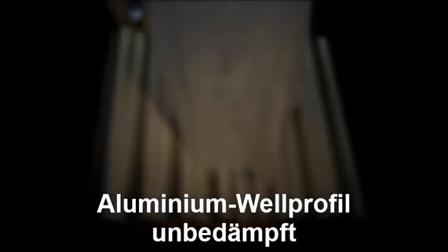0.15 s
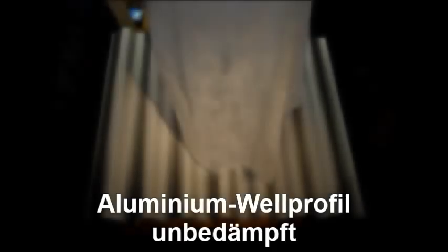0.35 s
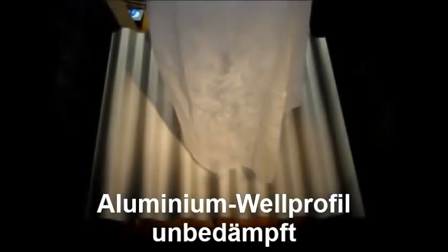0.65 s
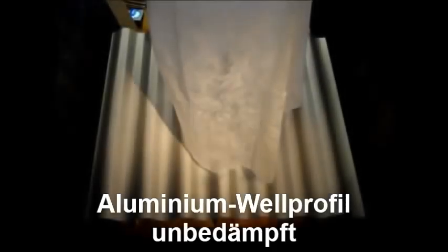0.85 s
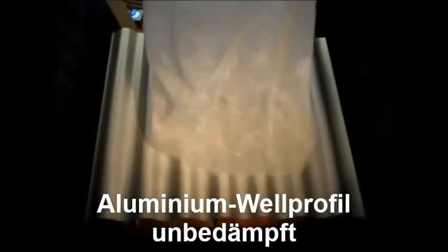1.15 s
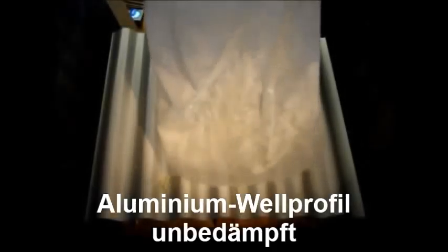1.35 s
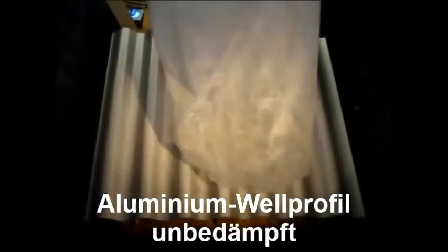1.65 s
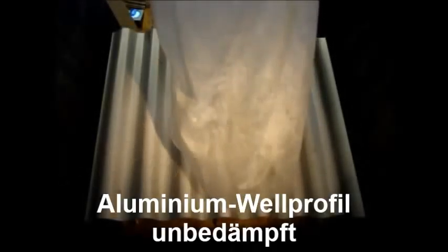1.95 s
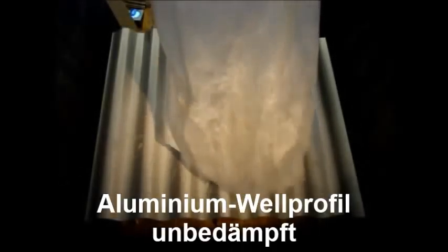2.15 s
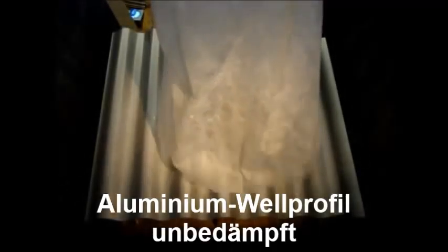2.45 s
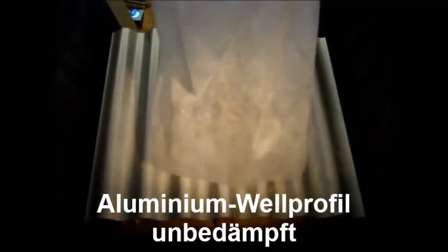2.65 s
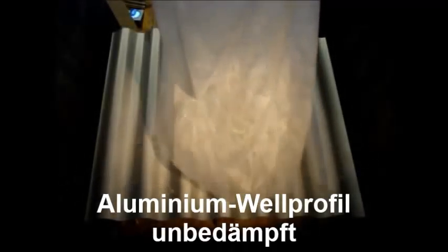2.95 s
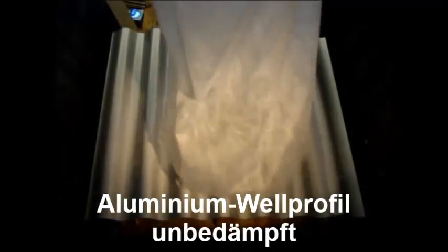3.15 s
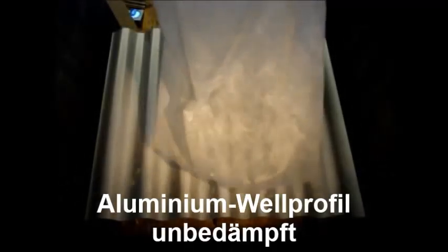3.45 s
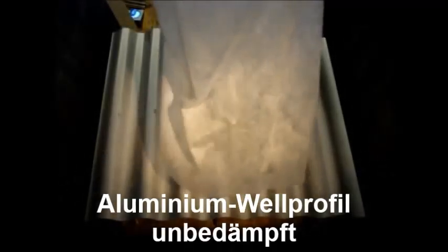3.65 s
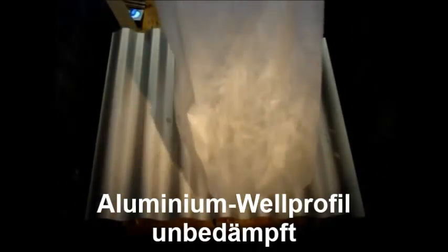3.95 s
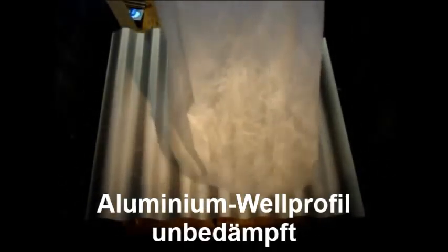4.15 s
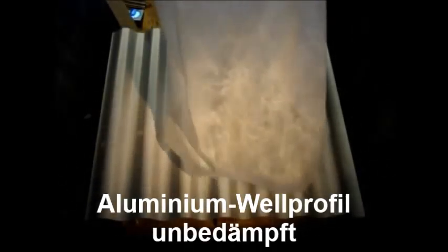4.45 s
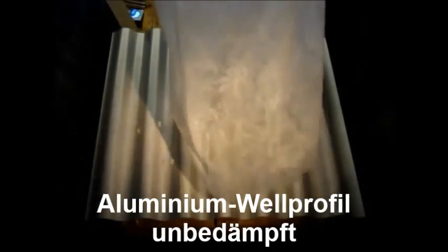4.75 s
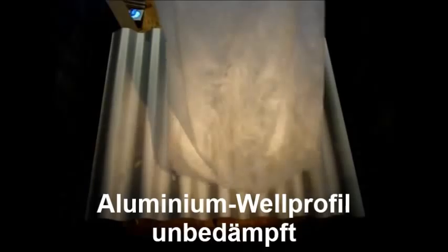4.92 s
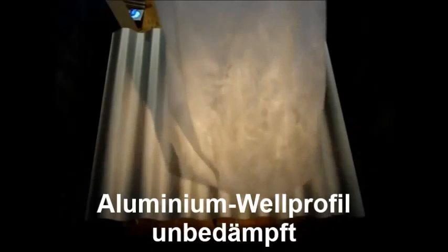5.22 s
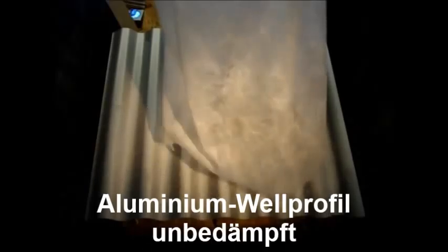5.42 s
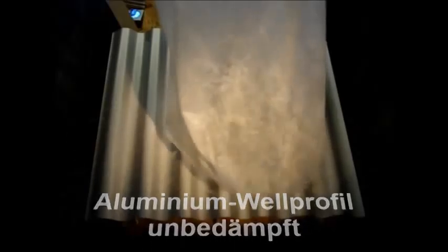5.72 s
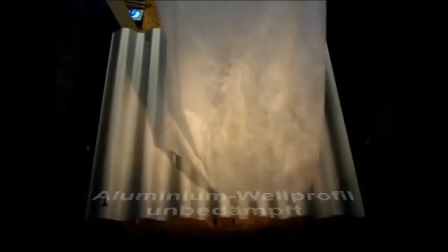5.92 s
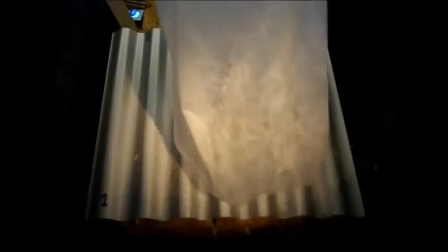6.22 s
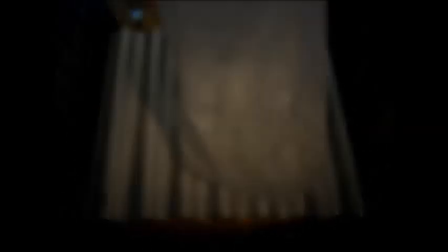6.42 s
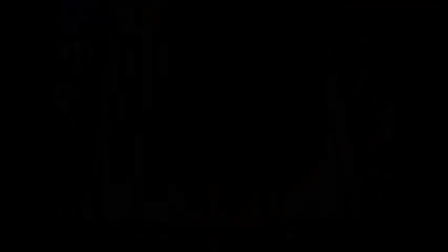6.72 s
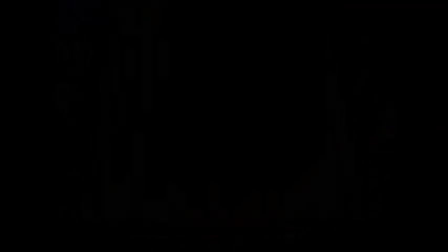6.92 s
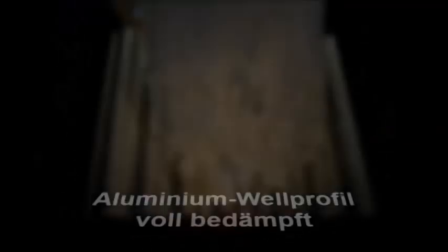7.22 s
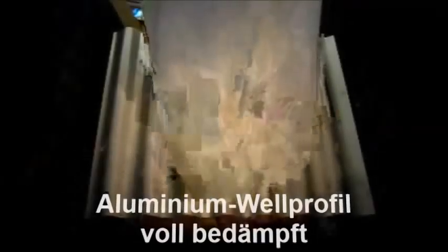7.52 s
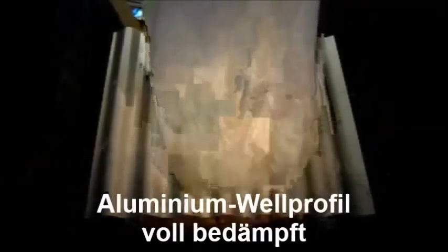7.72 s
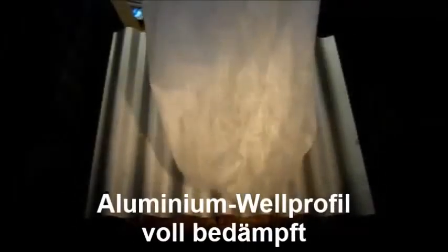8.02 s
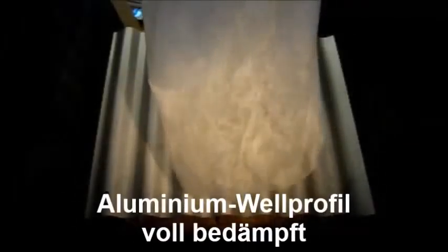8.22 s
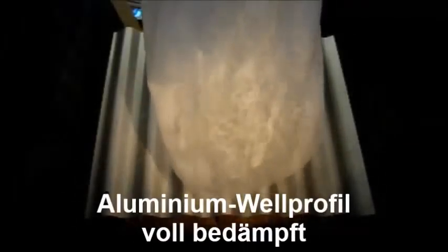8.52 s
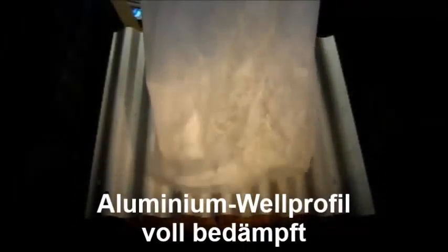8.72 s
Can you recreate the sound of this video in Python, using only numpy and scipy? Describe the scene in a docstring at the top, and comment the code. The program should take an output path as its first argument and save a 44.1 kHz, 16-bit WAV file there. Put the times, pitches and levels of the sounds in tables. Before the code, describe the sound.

Quiet electrical hum and hiss, then a tiny metallic valve clack. A loud, bright shower bursts onto bare corrugated aluminium, a dense tinny roar of countless ringing drops, steady for nearly six seconds. It cuts off to complete silence briefly, then the same shower resumes on a damped sheet, much quieter, duller and drier. Close single microphone, mono, slightly overloaded on the loud part, indoor test room.

```python
"""A shower falls on bare corrugated aluminium in a rain test: thousands of drops a second ring its modes.
Each drop is a short burst of noise plus decaying tones, landing at a random moment on a random spot.
A valve clacks first, made of noise cracks and metallic tones; a faint whistle stops before it.
After a silence the same shower patters on a damped sheet, quieter and duller.
Both runs come through one microphone channel with mains hum, buzz and hiss."""
import sys
import numpy as np
from scipy import signal
from scipy.fft import rfft, irfft, next_fast_len
from scipy.io import wavfile
from scipy.ndimage import uniform_filter1d, map_coordinates

SR = 44100
rng = np.random.default_rng(int(sys.argv[2]) if len(sys.argv) > 2 else 0)


def store_wav(level_fs):
    """Save 16-bit WAV to argv[1]."""
    pcm = np.round(np.clip(np.atleast_2d(level_fs), -1, 1) * 32767)
    wavfile.write(sys.argv[1], SR, pcm.T.astype(np.int16))


N = 391166

# bending modes of each sheet, the notes it rings at: (frequency [Hz], width [Hz], relative level [dB])
BARE_SHEET_MODES = [(263.2, 20, -9), (379, 15.5, -13.5), (425, 16, -14), (696, 73, -21.5), (942, 25.4, -10),
                    (981, 20, -7.5), (1124, 29, -12.5), (1214, 18, -7), (1347, 16, -7), (1545, 39, -9.5),
                    (1910, 34, -5), (2040, 41, -10.5), (2226, 10.6, -6), (2322, 67, -12.5), (2620, 17, -6),
                    (3073, 26, -6.5), (3602, 18, -3), (3900, 13, -3.5), (4207, 30, -0.5), (4510, 22, -1),
                    (4872, 53, -3), (5247, 38, -2.5), (6030, 37, -2.5), (6350, 16, 0.5), (6750, 13, -1.5),
                    (7820, 21, -3.5), (8200, 20, -4), (8970, 57, -13.6), (11250, 39, -17), (11830, 56, -15)]
DAMPED_SHEET_MODES = [(207, 38, -4.5), (288, 38, -4.3), (470, 25, -9), (1080, 95, 0.5), (1924, 72, -1.5),
                      (2130, 170, -7), (2370, 34, -1), (2645, 98, -3), (3090, 64, -1.5), (3360, 50, -1.5),
                      (3770, 120, -2.5), (4440, 252, -4.5), (4955, 100, -4), (5160, 180, -1),
                      (6450, 67, -6)]
# wash of splashes and crowded weak modes between those notes: (frequency [Hz], relative level [dB])
BARE_SHEET_WASH = [(25, -39.5), (80, -30), (200, -25.5), (560, -29), (850, -19.5), (2400, -15),
                   (2830, -16.5), (3200, -9), (5100, -11), (5650, -12), (7650, -10), (8700, -17),
                   (12800, -20.5), (14400, -17), (15800, -18)]
DAMPED_SHEET_WASH = [(25, -27), (80, -18.5), (350, -13), (600, -20), (830, -7.5), (1300, -7.5),
                     (1650, -7.5), (4000, -8), (5600, -8.5), (7600, -7.5), (9500, -13.5), (12700, -15),
                     (15600, -10.5)]
# how long the wash of one drop takes to fade by 60 dB: (frequency [Hz], fade time [s])
BARE_WASH_FADE = [(200, 0.13), (4000, 0.12), (8000, 0.055), (14000, 0.02)]
DAMPED_WASH_FADE = [(200, 0.078), (4000, 0.024), (8000, 0.014), (14000, 0.013)]
# strikes and rattles of the valve's plunger: (time [s], level [dB])
VALVE_STRIKES = [(.812, -42), (.817, -46), (.829, -41)]
# notes of the valve's metal body: (frequency [Hz], relative level [dB], time to fade by 60 dB [s])
VALVE_BODY_MODES = [(344, 4, 0.074), (970, -3, .06), (1224, -5, 0.18), (1980, -11, 0.091), (2950, -1, 0.11),
                    (3010, -15.5, 0.68), (3450, -2, .07), (4177, -6, 0.2), (5400, -2, .09),
                    (6880, -13, .05), (7300, -4, .05), (9380, -16, .06)]
# tone colour of the valve's crack and of the channel noises: (frequency [Hz], relative level [dB])
CRACK_COLOUR = [(100, -18.5), (330, 4), (1200, 1.5), (2200, -12.5), (3200, -3), (7500, -8.5), (10000, -20),
                (15000, -29.5)]
HUM_COLOUR = [(20, -8.5), (50, 2), (150, -6.5), (250, -13), (350, -23.5), (450, -17.5), (800, -28.5),
              (2000, -34.5), (15000, -54)]
BUZZ_COLOUR = [(50, -9.5), (1000, -3.5), (4500, 3), (8000, -5), (11000, -5), (14500, -1.5)]
HISS_COLOUR = [(25, 3.5), (100, -6.5), (350, -11), (900, -23), (10000, -26.5), (14500, -21.5)]
# brief lulls where the stream thins out: (time [s], depth [dB])
STREAM_LULLS = [(1.09, 6.5), (1.172, 8), (1.262, 3.5), (1.307, 3), (3.606, 2), (4.739, 5.5), (5.026, 2),
                (5.538, 2), (7.348, 3.5), (7.646, 2.5), (8.696, 6.5)]

SPRAY_START, CUT_START, CUT_END = 1.077, 6.76, 7.092  # s
MAINS_HZ, WHINE_HZ = 50, 14035
TOP_HZ = 15830  # band limit of the channel
BARE_DB, DAMPED_DB = -16.35, -25.5  # level on each sheet once the pressure is up, before any thinning
START_WEAK_DB, BUILD_UP_S = 2.5, 0.1  # shortfall at the start, and the time constant of its fading
LULL_S = 0.012  # each lull fades in and out over about this time
SLAP_DB, SLAP_S = 2, 0.004  # extra strength as the stream's front lands, and its time constant


def amp(db):
    """Turn decibels into a plain multiplier."""
    return 10 ** (np.asarray(db) / 20)


def unit(x):
    """Scale a sound to an average (rms) strength of one."""
    return x / np.sqrt(np.mean(x ** 2) + 1e-20)


def clock():
    """The time of every sample, in seconds."""
    return np.arange(N) / SR


def along(points, hz):
    """Read a curve of (Hz, value) points, joined by lines on a log frequency axis."""
    f, v = np.transpose(points)
    return np.interp(np.log(hz + 1), np.log(f + 1), v)


def wobble(rate, steady_s=0.14):
    """Quick random swings, rate knots a second, that even out over steady_s."""
    knots = rng.standard_normal(int(N * rate / SR) + 4)
    swings = map_coordinates(knots, [clock() * rate])
    return swings - uniform_filter1d(swings, int(steady_s * SR))


def coloured(x, spectrum, size=8192):
    """Filter x to the given (Hz, dB) curve, with no sound ahead of its cause."""
    log_gain = np.log(amp(along(spectrum, np.fft.rfftfreq(size, 1 / SR))))
    # folding the cepstrum puts the whole response after time zero
    cepstrum = irfft(log_gain)
    cepstrum[1:size // 2] *= 2
    cepstrum[size // 2 + 1:] = 0
    response = irfft(np.exp(rfft(cepstrum)))
    filtered = signal.fftconvolve(np.atleast_2d(x), response[None], axes=1)
    return filtered[:, :x.shape[-1]].reshape(x.shape)


def whine(hz, db, end):
    """A thin, faint whistle: one pure tone that fades out in the last 0.05 s before end."""
    t = clock()
    fade = np.clip((end - t) * 20, 0, 1)
    return amp(db) * np.sin(2 * np.pi * hz * t) * fade


def mains(hum_db, buzz_db, hiss_db):
    """Pick-up in the cable: every half cycle a sharp spike, then a surge of the same sign, over hiss."""
    half_cycle, lag = round(SR / MAINS_HZ / 2), round(.0017 * SR)  # samples
    kicks = np.zeros(N)
    moments = np.arange(half_cycle // 2, N, half_cycle)
    kicks[moments] = (-1) ** np.arange(len(moments))
    buzz = amp(buzz_db) * unit(coloured(kicks, BUZZ_COLOUR))
    hum = amp(hum_db) * unit(coloured(np.roll(kicks, lag), HUM_COLOUR))
    hiss = amp(hiss_db) * unit(coloured(rng.standard_normal(N), HISS_COLOUR))
    return hum + buzz + hiss


def valve(crack_db, crack_t60, room_db, room_t60, blur_hz):
    """Each contact is a short crack and a rough metallic ring, with a faint room tail."""
    out, t = np.zeros(N), np.arange(SR // 2) / SR
    for s, db in VALVE_STRIKES:
        # loose parts jostle, so the phase of each mode wanders
        steps = rng.standard_normal((len(VALVE_BODY_MODES), len(t)))
        wander = np.cumsum(steps, axis=1) * np.sqrt(2 * np.pi * blur_hz / SR)
        ring = np.zeros(len(t))
        for (hz, level, t60), phase in zip(VALVE_BODY_MODES, wander):
            ring += amp(level - 60 * t / t60) * np.sin(2 * np.pi * hz * t + phase)
        fading = amp(crack_db - 60 * t / crack_t60) + amp(room_db - 60 * t / room_t60)
        crack = fading * unit(coloured(rng.standard_normal(len(t)), CRACK_COLOUR))
        out[round(s * SR):][:len(t)] += amp(db) * (.5 * ring + crack)
    return out


def flow():
    """Strength of the stream in dB: a slap, a build-up, then it holds, apart from brief lulls."""
    t = clock()
    age = np.maximum(t - SPRAY_START, 0)
    slap = SLAP_DB * np.exp(-age / SLAP_S)
    shortfall = START_WEAK_DB * np.exp(-age / BUILD_UP_S)
    lulls = sum(depth_db * np.exp(-((t - s) / LULL_S) ** 2) for s, depth_db in STREAM_LULLS)
    return slap - shortfall - lulls


def spray(level_db, slosh_db, flutter_db):
    """Force of the stream: it flutters, and sloshing thins it out for moments."""
    flutter = flutter_db * wobble(110)
    slosh = slosh_db * np.abs(wobble(20))
    return amp(level_db + flow() + flutter - slosh)


def sheet(modes, wash, decay, count=24, size=8192):
    """The sound of one drop at each of count spots: fading noise plus the ringing modes."""
    # treble and bass of the noise fade at their own speeds
    hz, frames, z = signal.stft(rng.standard_normal((count, size)), SR, nperseg=128)
    fading = amp(-60 * frames / along(decay, hz)[:, None])
    fading /= np.sqrt(np.mean(fading ** 2, axis=1, keepdims=True))
    diffuse = signal.istft(z * fading, SR, nperseg=128)[1][:, :size]
    diffuse /= np.linalg.norm(diffuse, axis=1, keepdims=True)

    t = np.arange(size) / SR
    rings = []
    for f, width, db in modes:
        # a wider mode dies sooner
        strength = amp(db) * 2 * np.pi * width / SR
        rings.append(strength * np.exp(-np.pi * width * t) * np.cos(2 * np.pi * f * t))
    # a mode swings up at one spot and down at another
    shapes = np.sign(rng.standard_normal((count, len(modes))))
    spots = coloured(diffuse, wash) + shapes @ np.array(rings)
    return unit(spots) / np.sqrt(size)


def patter(spots, force, drops_per_s, scatter_db):
    """Drops of unequal size land at random moments on random spots."""
    lands = rng.random(N) < drops_per_s / SR
    spread = amp(scatter_db * (2 * rng.random(N) - 1))
    sizes = spread * np.sign(rng.standard_normal(N))
    blows = unit(lands * sizes) * force
    where = rng.integers(len(spots), size=N)
    return sum(signal.oaconvolve(blows * (where == k), spot)[:N] for k, spot in enumerate(spots))


def damped_sheet():
    """With damping each drop dies quickly, so the single blows stand out more."""
    force = spray(DAMPED_DB, slosh_db=1.6, flutter_db=1.22)
    spots = sheet(DAMPED_SHEET_MODES, DAMPED_SHEET_WASH, DAMPED_WASH_FADE)
    return patter(spots, force, drops_per_s=5500, scatter_db=11.0)


def bare_sheet():
    """The stream arrives at once and sets the bare metal ringing."""
    force = spray(BARE_DB, slosh_db=1.01, flutter_db=1.38) * (clock() > SPRAY_START)
    spots = sheet(BARE_SHEET_MODES, BARE_SHEET_WASH, BARE_WASH_FADE)
    return patter(spots, force, drops_per_s=4500, scatter_db=9.5)


def scene():
    """Two runs with silence between them, the same in both ears."""
    t = clock()
    floor = mains(hum_db=-50.0, buzz_db=-64.5, hiss_db=-61.5)
    whistle = whine(WHINE_HZ, db=-68, end=.3)
    clack = valve(crack_db=-7, crack_t60=.035, room_db=-18.5, room_t60=0.51, blur_hz=20)
    first = bare_sheet() + clack + floor + whistle
    second = damped_sheet() + floor
    mono = first * (t < CUT_START) + second * (t > CUT_END)
    return np.array([mono, mono])


def record(dry):
    """The input stage rounds off the peaks, upward ones sooner; nothing is kept above the band limit."""
    ceiling = np.where(dry > 0, .37, .54)
    rounded = dry / (1 + np.abs(dry / ceiling) ** 4) ** (1 / 4)
    size = next_fast_len(N + SR // 2)
    # the last 100 Hz below the limit slope down to nothing
    passed = np.clip((TOP_HZ - np.fft.rfftfreq(size, 1 / SR)) / 100, 0, 1)
    return irfft(rfft(rounded, size) * passed, size)[:, :N]


dry = scene()
out = record(dry)
store_wav(out)
```